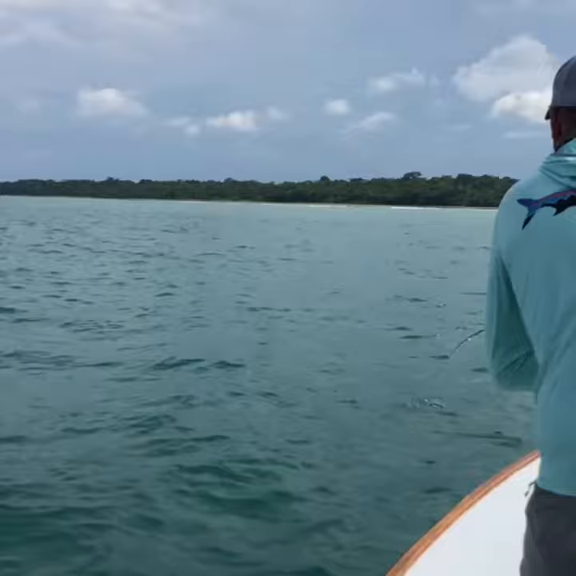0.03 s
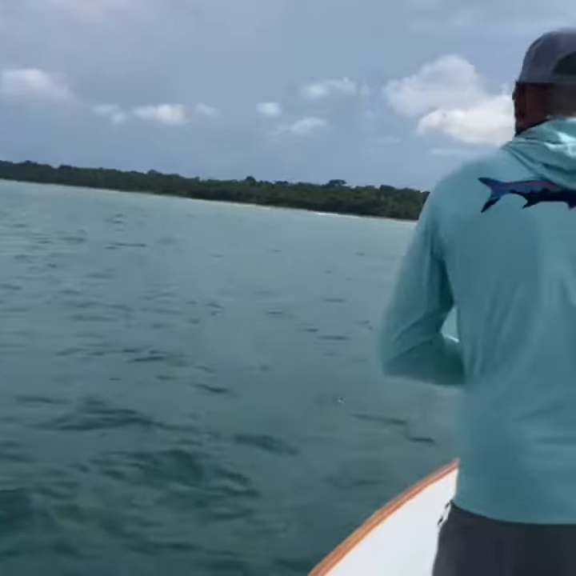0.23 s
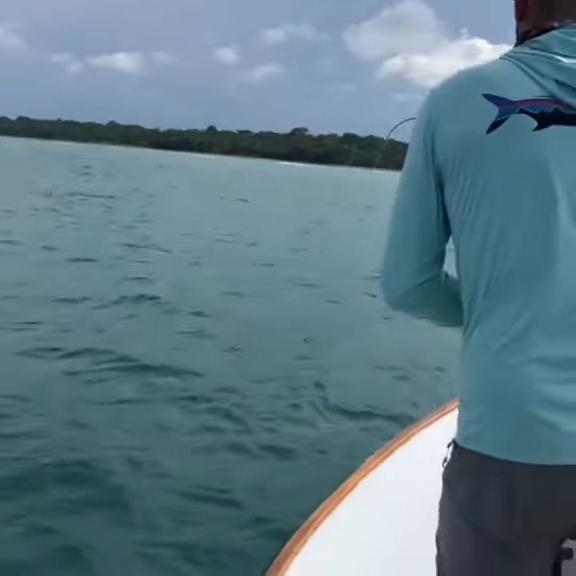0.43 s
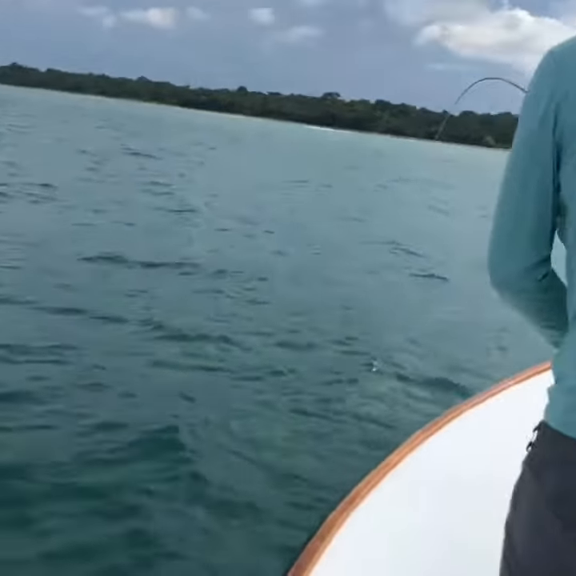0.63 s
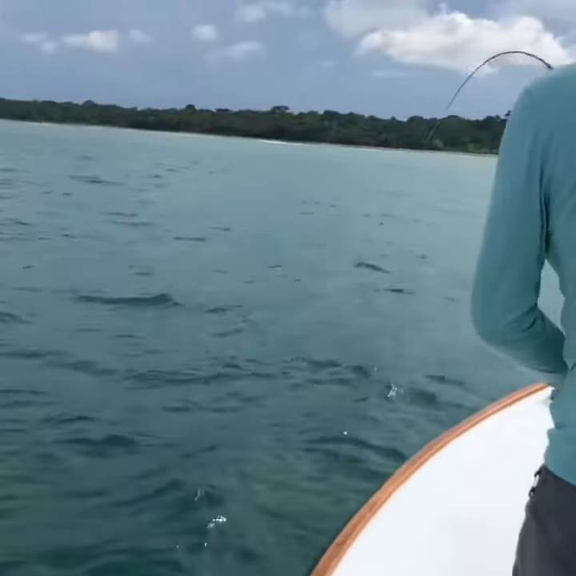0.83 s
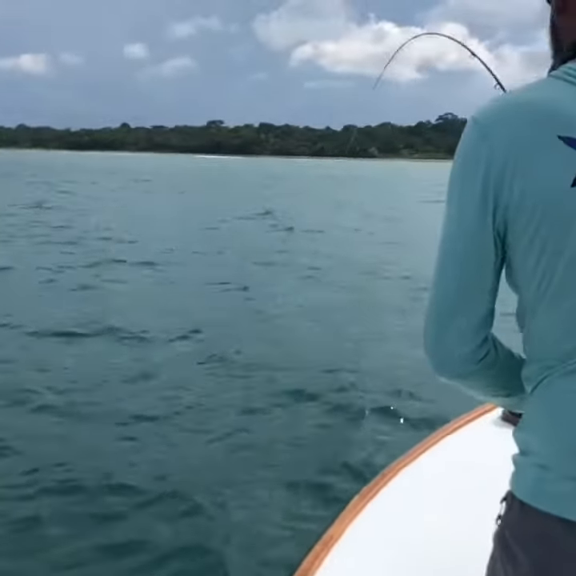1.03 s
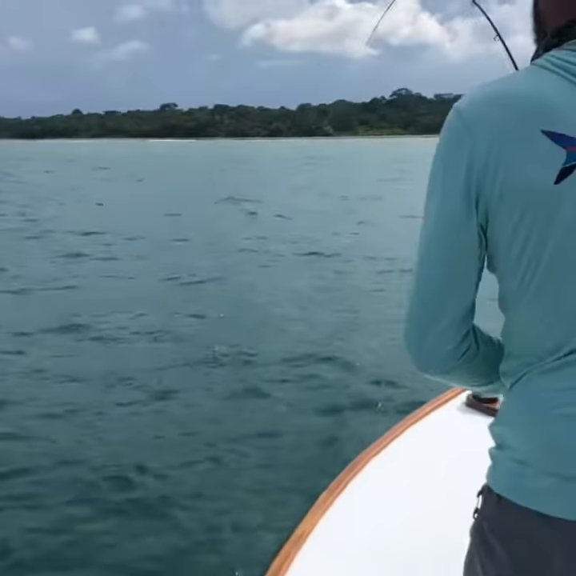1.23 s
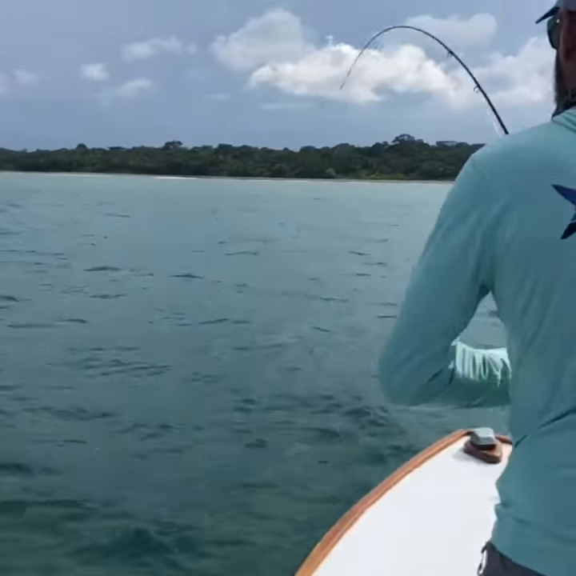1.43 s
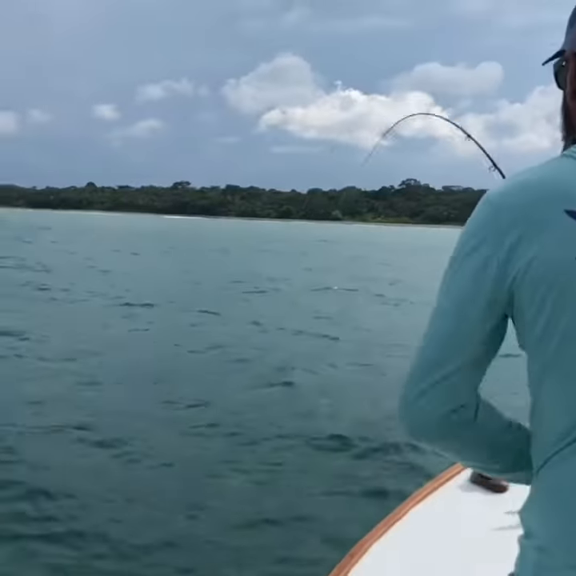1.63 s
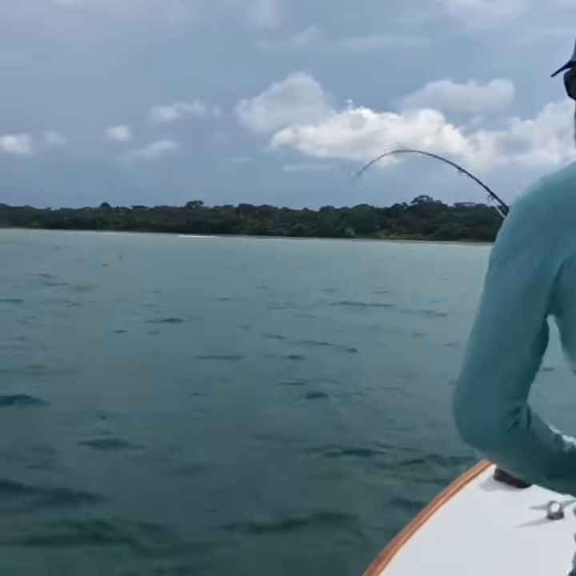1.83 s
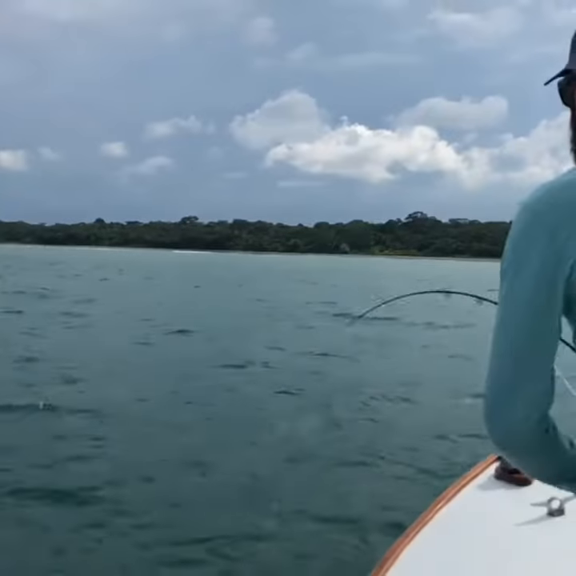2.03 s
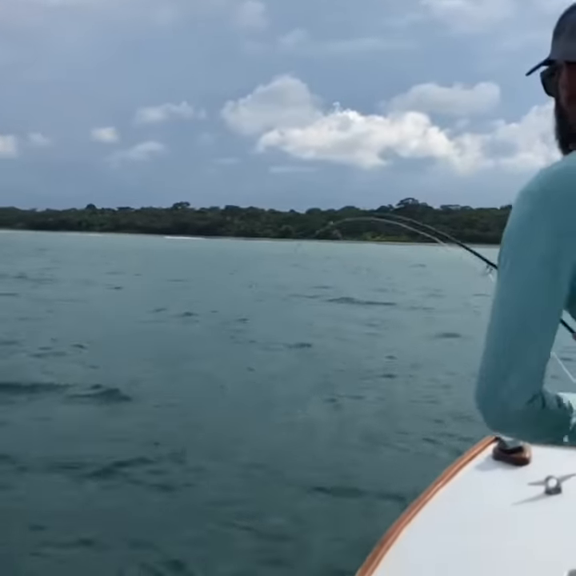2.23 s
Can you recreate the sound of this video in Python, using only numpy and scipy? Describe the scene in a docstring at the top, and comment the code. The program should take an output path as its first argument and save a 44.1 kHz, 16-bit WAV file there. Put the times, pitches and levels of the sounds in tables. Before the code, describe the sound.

Gusty wind buffets the microphone with a low rumble on the bow of a small boat, over faint splashing chop. The wind drops, a fishing reel ticks softly nearby, and a wave slaps and gurgles against the hull.

```python
"""On the bow of a small boat in choppy water, one microphone out in the wind.
Gusts buffet it: a stream of eddies, sharper the harder it blows. Chop splashes around the boat
and knocks on the hull. When the wind drops, the pawl of a fishing reel is heard ticking,
and a wave slaps the hull, gulps with trapped air and falls back as spray."""
import sys
import numpy as np
from scipy import signal
from scipy.fft import rfft, irfft, next_fast_len
from scipy.io import wavfile
from scipy.ndimage import uniform_filter1d, minimum_filter1d, map_coordinates

SR = 44100
rng = np.random.default_rng(int(sys.argv[2]) if len(sys.argv) > 2 else 0)


def pcm_store(signal):
    """Save signal as 16-bit PCM."""
    levels = np.round(np.clip(np.atleast_2d(signal), -1, 1) * 32767)
    wavfile.write(sys.argv[1], SR, levels.astype(np.int16).T)


N = 101429

# Spectra of the noise layers. Each row: frequency in Hz, relative level in dB.
SEA_SPECTRUM = [(25, -19.5), (60, 14), (130, 2), (250, -26), (450, -0.5), (900, -4.5), (2000, -16),
                (4600, -16.5), (7000, -18.5), (9000, -19.5), (11000, -23.5), (13500, -21), (16000, -36)]
HISS_SPECTRUM = [(500, -5), (2000, 1.5), (4700, -2.5), (6500, -8.5), (13000, -8.5), (16000, -4)]
PAWL_SPECTRUM = [(1000, -9), (3900, -3), (4500, 2), (5300, -0.5), (6300, -5.5), (7200, -3.5), (8600, -8),
                 (10300, -9), (12500, -5.5), (14000, -13), (16000, -14.5)]
SPOOL_SPECTRUM = [(3000, -27), (4100, -12), (4380, -4), (4750, 10), (5300, -16), (5800, -15), (8000, -15),
                  (8600, 0), (9800, -25), (16000, -31)]
CHURN_SPECTRUM = [(40, -34), (110, -13.5), (300, 2), (700, -6), (1100, -10.5), (1800, -22), (4000, -25.5),
                  (16000, -85)]
SPRAY_SPECTRUM = [(400, 5), (1300, 0.5), (2500, -6), (4000, -5), (6000, -5.5), (9000, -3), (16000, -18)]
BREEZE_SPECTRUM = [(25, -20), (60, -6), (120, 4), (200, 2.5), (350, -9.5), (1000, -46)]
RUMBLE_SPECTRUM = [(20, -63), (34, -40), (48, -7), (75, -6), (105, -1), (138, 3.5), (175, -2), (300, -49),
                   (700, -100)]
# How each layer swells and fades at the microphone. Each row: time in seconds, relative level in dB.
HISS_LEVEL = [(0.04, -56.5), (0.18, -58), (0.3, -58.5), (0.6, -67), (0.745, -50.5), (0.8, -57),
              (0.92, -60.5), (1.15, -60.5), (1.37, -64.5), (1.42, -67), (2.3, -78)]
CHURN_LEVEL = [(1.4, -67), (1.48, -44), (1.58, -63), (1.66, -52.5), (1.775, -51), (1.81, -33.5),
               (1.86, -32), (1.91, -38), (2.0, -42.5), (2.11, -42), (2.15, -47.5), (2.3, -47.5)]
SPRAY_LEVEL = [(1.74, -100), (1.785, -58), (1.82, -52.5), (1.88, -47.5), (1.94, -46.5), (2.0, -54.5),
               (2.3, -66)]
BREEZE_LEVEL = [(1.4, -57), (1.6, -61), (1.75, -51.5), (1.88, -55), (1.97, -45), (2.11, -45.5), (2.3, -44)]
RUMBLE_LEVEL = [(0.04, -61), (0.09, -50), (0.22, -34.5), (0.3, -31), (0.41, -34), (0.46, -22),
                (0.58, -21.5), (0.64, -35.5), (0.71, -44), (0.765, -50), (0.785, -28.5), (0.82, -44),
                (0.9, -39), (1.0, -20.5), (1.08, -23), (1.14, -21.5), (1.21, -15.5), (1.26, -26),
                (1.39, -28.5), (1.42, -67)]
DRONE_LEVEL = [(0.04, -33), (0.2, -28), (0.3, -28), (0.4, -28.5), (0.46, -21), (0.58, -18.5), (0.64, -38.5),
               (0.71, -58), (0.74, -44), (0.78, -34.5), (0.88, -45.5), (0.95, -24), (1.14, -25.5),
               (1.25, -37.5), (1.38, -38.5), (1.42, -75)]
GUST_LEVELS = [
    [(0.036, -26), (0.05, -22), (0.092, -34), (0.112, -24.5), (0.134, -33.5), (0.258, -21), (0.274, -24.5),
     (0.298, -21), (0.342, -27.5), (0.364, -18.5), (0.385, -52)],
    [(0.395, -28), (0.462, -11.5), (0.564, -16.5), (0.614, -24), (0.634, -49), (0.71, -35)],
    [(0.72, -65), (0.729, -18.5), (0.748, -20.5), (0.762, -47), (0.78, -42.5), (0.824, -31), (0.84, -49),
     (0.885, -63)],
    [(0.905, -32), (0.93, -23), (1.04, -16.5), (1.138, -11.5), (1.188, -21), (1.214, -15), (1.252, -23),
     (1.384, -29.5), (1.405, -74)],
]  # one table per gust
# Chop around the boat. Each row: start, rise and t60 in seconds, level in dB, centre in Hz,
# spread in octaves.
SPLASHES = [(0.038, 0.021, 0.11, -44, 11100, 0.94), (0.037, 0.013, 0.026, -38.5, 2020, 2.9),
            (0.231, 0.0012, 0.021, -45.5, 7000, 2.9), (0.232, 0.002, 0.12, -47, 2960, 0.87),
            (0.36, 0.06, 0.088, -45.5, 2040, 0.96), (0.49, 0.044, 0.23, -52, 9000, 2.3),
            (0.669, 0.0046, 0.26, -44.5, 1460, 0.69), (0.723, 0.00059, 0.015, -37, 4270, 0.59),
            (0.724, 0.0043, 0.071, -43.5, 2170, 1), (0.763, 0.0054, 0.05, -46.5, 1670, 0.53),
            (1.009, 0.014, 0.18, -47.5, 5330, 0.55), (1.446, 0.0051, 0.084, -45, 636, 1.15),
            (1.688, 0.0013, 0.066, -41.5, 594, 0.95), (1.784, .002, 0.028, -44.5, 3750, 0.46),
            (1.874, 0.0067, 0.028, -41.5, 3670, 0.32), (1.922, 0.0099, 0.06, -49.5, 3000, 0.54)]
# Dull knocks on the hull. Each row: start in seconds, relative level in dB.
KNOCKS = [(0.042, -20), (0.7311, -13.5), (0.806, -22)]
# The hull's resonances. Each row: frequency in Hz, relative level in dB, t60 in seconds.
HULL_MODES = [(128, -11, 0.079), (269, 3.5, 0.056), (395, -2.5, 0.054), (570, -16.5, 0.044)]
# Snaps of the reel's pawl. Each row: start in seconds, relative level in dB.
PAWL_TICKS = [(1.3998, -45.5), (1.4304, -44.5), (1.4575, -45), (1.4822, -45.5), (1.505, -42),
              (1.5296, -42.5), (1.5558, -43.5), (1.579, -44.5), (1.6006, -44.5), (1.622, -46),
              (1.641, -45.5), (1.663, -48), (1.689, -45.5), (1.72, -43), (1.7466, -40.5), (1.7697, -41.5),
              (1.794, -45), (1.82, -49.5), (1.8478, -46), (1.8722, -43), (1.8934, -49), (1.92, -42.5),
              (1.947, -44), (1.9703, -43), (2.0007, -41.5), (2.028, -42.5), (2.052, -44), (2.0754, -42),
              (2.1011, -42.5), (2.13, -40), (2.157, -41.5), (2.1803, -44.5), (2.202, -43), (2.223, -42),
              (2.245, -42), (2.274, -46)]
# Air pockets at the hull. Each row: start in seconds, starting pitch in Hz, level in dB,
# t60 in seconds, glide as a fraction of that pitch per second.
GULPS = [(1.452, 427, -42.5, 0.22, 3.5), (1.475, 369, -34.5, 0.077, -5), (1.518, 689, -44.5, 0.12, 1.5),
         (1.691, 463, -36, 0.089, -2), (1.758, 907, -34, 0.066, -4), (1.785, 655, -17, 0.018, 12),
         (1.787, 222, -26.5, 0.2, 12.5), (1.806, 356, -29, 0.099, -0.5), (1.809, 767, -27.5, 0.047, 0),
         (1.824, 990, -27, 0.022, 7), (1.846, 258, -31, 0.23, 3), (1.868, 314, -28, 0.073, 1),
         (1.915, 671.6, -38, 0.25, 2.5)]
# How long an eddy presses; faster air is shorter and brighter. Each row: time and width in seconds.
TYPICAL_EDDY_WIDTH = [(0.04, 0.0006), (0.16, 0.00056), (0.25, 0.00028), (0.36, 0.0004), (0.41, 0.00071),
                      (0.52, 0.00013), (0.6, 0.00064), (0.68, 0.0017), (0.74, 0.00045), (0.87, 0.0008),
                      (0.95, 0.00052), (1.05, 0.00037), (1.15, 0.00014), (1.22, 0.00032), (1.28, 0.00034),
                      (1.39, 0.00042)]
# The hardest eddies. Each row: time in seconds, relative level in dB, width in seconds.
HARD_EDDIES = [(0.0745, -29, 0.00029), (0.1955, -29, 0.00025), (0.228, -28, 0.00025), (0.243, -14, .00018),
               (0.26, -24, 0.00019), (0.288, -22, 0.0003), (0.303, -15, 0.00033), (0.3576, -16.5, 0.00024),
               (0.462, -14.5, 0.00032), (0.4862, -8, 0.00013), (0.509, -15, 0.00025), (0.517, -11, 0.00021),
               (0.5492, -10, 0.00014), (0.7286, -23.5, 0.00031), (0.8047, -42, 0.00043),
               (0.929, -14, 0.00044), (1.0151, -14.5, 0.0002), (1.058, -14, 0.00011),
               (1.0936, -6.5, 0.00022), (1.101, -12, 0.00026), (1.121, -9, 0.000083), (1.1305, -8, 0.00031),
               (1.144, -2, 0.00011), (1.158, -7.5, 0.00012), (1.174, -6, 0.00011), (1.1947, -9, 0.000094),
               (1.211, -7.5, 0.00017), (1.246, -12.5, 0.00014), (1.269, -18.5, 0.00022),
               (1.338, -27, 0.0002)]


def amp(db):
    """Decibels to gain."""
    return 10 ** (np.asarray(db) / 20)


def unit(x):
    """Scale to rms 1."""
    return x / np.sqrt(np.mean(x ** 2) + 1e-20)


def steady(x, size):
    """x held at rms 1 over a running window of size samples."""
    window = signal.windows.hann(size)
    power = signal.fftconvolve(x ** 2, window / window.sum(), "same")
    return x / np.sqrt(np.abs(power) + 1e-12)


def clock():
    """The time of each sample."""
    return np.arange(N) / SR


def curve(rows):
    """One value per sample from (seconds, value) rows."""
    return np.interp(clock(), *np.transpose(rows))


def wobble(rate):
    """A smooth random curve, rate knots a second."""
    return map_coordinates(rng.standard_normal(4096), [clock() * rate], mode="wrap")


def resonance(f, hz, q):
    """Response of a resonant low-pass."""
    return 1 / (1 - (f / hz) ** 2 + 1j * f / (hz * q))


def filtered(x, response):
    """x through a frequency response."""
    size = next_fast_len(N + SR // 2)
    return irfft(rfft(x, size) * response(np.fft.rfftfreq(size, 1 / SR)), size)[:N]


def colour(x, points):
    """x shaped by (Hz, dB) points, at rms 1."""
    f, db = np.transpose(points)
    return unit(filtered(x, lambda hz: amp(np.interp(np.log(hz + 1), np.log(f + 1), db))))


def noise(points):
    """Coloured noise of rms 1."""
    return colour(rng.standard_normal(N), points)


def scatter(times, shapes):
    """Sum short shapes (rows), each starting at its time."""
    at = np.round(times * SR).astype(int)[:, None] + np.arange(shapes.shape[1])
    inside = (at >= 0) & (at < N)
    return np.bincount(at[inside], shapes[inside], N)


def sea():
    """Open water all round, and a fine flickering hiss while the wind blows."""
    water = amp(-54.5 + 2.5 * wobble(rate=11.7)) * noise(SEA_SPECTRUM)
    hiss = amp(curve(HISS_LEVEL) + 3.2 * wobble(rate=60)) * noise(HISS_SPECTRUM)
    return water + hiss


def splashes():
    """Around the boat, short bursts of droplets swell and die away."""
    out = np.zeros(N)
    for start, rise, t60, db, hz, octaves in SPLASHES:
        t = clock() - start
        patter = rng.standard_normal(N) * amp(1.7 * wobble(rate=500))
        drops = filtered(patter, lambda f: np.exp(-(np.log2((f + 1) / hz) / octaves) ** 2 / 2))
        envelope = np.clip(t / rise, 0, 1) * amp(db - 60 * np.maximum(t - rise, 0) / t60)
        out += unit(drops) * envelope
    return out


def knocks(attack_s=0.0014):
    """Chop knocks on the hull below the microphone and sets it ringing briefly."""
    out = np.zeros(N)
    for start, db in KNOCKS:
        t = np.maximum(clock() - start, 0)
        attack = 1 - np.exp(-t / attack_s)
        for hz, mode_db, t60 in HULL_MODES:
            out += attack * amp(db + mode_db - 60 * t / t60) * np.sin(2 * np.pi * hz * t)
    return out


def reel(hold_s=0.0013, snap_t60_s=0.0094, ring_t60_s=0.044):
    """Nearby, the pawl snaps over its ratchet and the spool rings faintly."""
    starts, db = np.transpose(PAWL_TICKS)
    age = np.arange(SR // 30) / SR
    size = amp(db - 7.5)[:, None]
    snap = amp(-60 * np.maximum(age - hold_s, 0) / snap_t60_s)
    ring = amp(-7.5 - 60 * age / ring_t60_s)
    pawl = scatter(starts, size * snap) * noise(PAWL_SPECTRUM)
    spool = scatter(starts, size * ring) * noise(SPOOL_SPECTRUM)
    return pawl + spool


def bubbles(centre_hz, octaves, t60_cycles, spread_db, count):
    """A steady swarm of small bubbles, each rising in pitch as it rings out; rms 1."""
    starts = rng.uniform(0, N / SR, count)
    hz = np.minimum(centre_hz * 2 ** (octaves * rng.standard_normal(count)), SR / 3)
    sizes = amp(spread_db * np.minimum(rng.exponential(1, count), 4))
    cycles = hz[:, None] * np.arange(SR // 40) / SR
    age = cycles / t60_cycles
    rings = np.sin(2 * np.pi * cycles * (1 + 0.077 * np.minimum(age, 2))) * amp(-60 * age)
    return unit(scatter(starts, sizes[:, None] * rings))


def wave(attack_s=0.00081):
    """Close by, a wave traps ringing air under the hull, churns, and falls back as spray."""
    gulps = np.zeros(N)
    for start, hz, db, t60, glide in GULPS:
        t = np.maximum(clock() - start, 0)
        envelope = amp(db - 60 * t / t60) * (1 - np.exp(-t / attack_s))
        gulps += envelope * np.sin(2 * np.pi * hz * t * (1 + glide * t / 2))
    churn = rng.standard_normal(N)
    churn += 0.22 * bubbles(centre_hz=606, octaves=0.535, t60_cycles=16, spread_db=5, count=700)
    churn = steady(colour(churn, CHURN_SPECTRUM), size=SR // 12)
    spray = 0.5 * rng.standard_normal(N)
    spray += bubbles(centre_hz=2890, octaves=0.74, t60_cycles=25, spread_db=3, count=1800)
    spray = colour(spray, SPRAY_SPECTRUM)
    return gulps + amp(curve(CHURN_LEVEL) - 1) * churn + amp(curve(SPRAY_LEVEL)) * spray


def pushes(times, sizes, widths, port_hz=162, cavity_hz=593):
    """Smooth pressure bumps on the microphone: its port cuts the lows, its cavity the highs."""
    def microphone(f):
        port = -(f / port_hz) ** 2 * resonance(f, port_hz, q=0.66)
        return port * resonance(f, cavity_hz, q=1)

    t = np.arange(-SR // 50, SR // 50) / SR
    bumps = sizes[:, None] / np.cosh(np.clip(t / widths[:, None], -40, 40))
    return filtered(scatter(times + t[0], bumps), microphone)


def eddy_stream(per_second=430, sharpen_per_db=0.16, count=3000):
    """In each gust, eddies push and pull at the microphone at random; bigger ones are shorter."""
    jitter, side = rng.random((count, 2)).T
    size_db = 1.5 * np.clip(rng.standard_normal(count), -2, 2)
    times = (np.arange(count) + 4 * jitter) / per_second
    widths = np.interp(times, *np.transpose(TYPICAL_EDDY_WIDTH)) * np.exp(-sharpen_per_db * size_db)
    clump_db = 1.5 * np.interp(times, clock(), wobble(rate=110))  # eddies come in clumps
    sizes = np.sign(side - 0.5) * amp(size_db + clump_db)
    heard = times < N / SR
    stream = steady(pushes(times[heard], sizes[heard], widths[heard]), size=SR // 20)
    gust_db = curve(np.vstack([*GUST_LEVELS, [(1.42, -101)]]))  # the last gust dies out
    return amp(gust_db - 1.5) * stream


def buffeting(lull_db=-5, lull_lead_s=0.0064, lull_width_s=0.0021, rebound_s=0.002546):
    """Right on the microphone, the stream slackens before each hard eddy; air is sucked back after."""
    times, db, widths = np.transpose(HARD_EDDIES)
    sizes = amp(db + 8)
    blows = pushes(times, sizes, widths)
    rebounds = pushes(times + rebound_s, sizes * amp(-7), 1.47 * widths)
    lulls = np.exp(-((clock() - times[:, None] + lull_lead_s) / lull_width_s) ** 2).max(axis=0)
    return eddy_stream() * amp(lull_db * lulls) + blows - rebounds


def wind(drone_hz=219.6):
    """Gusts buffet the microphone over a hollow drone and a deep rumble; light air remains after them."""
    eddies = buffeting()
    hollow = filtered(rng.standard_normal(N), lambda f: (f * resonance(f, drone_hz, q=3.85)) ** 2)
    drone = amp(curve(DRONE_LEVEL)) * steady(hollow, size=SR // 10)
    rumble = amp(curve(RUMBLE_LEVEL)) * steady(noise(RUMBLE_SPECTRUM), size=SR // 10)
    breeze = amp(curve(BREEZE_LEVEL)) * noise(BREEZE_SPECTRUM)
    return eddies + drone + rumble + breeze


def scene():
    """Wind, water, hull and reel at one microphone on the bow."""
    return (wind() + splashes() + wave() + knocks() + reel() + sea())[None]


def record(dry):
    """The microphone opens, a limiter holds the peaks, and nothing is kept above the band limit."""
    open_s, ceiling, limiter_s, top_hz = 0.036, 0.85, 0.004, 15850
    x = dry[0] * (clock() >= open_s)
    size = int(limiter_s * SR)
    gain = minimum_filter1d(ceiling / np.maximum(np.abs(x), ceiling), 2 * size)
    gain = uniform_filter1d(uniform_filter1d(gain, size), size)
    return filtered(x * gain, lambda hz: hz < top_hz)[None]


dry = scene()
out = record(dry)
pcm_store(out)
```